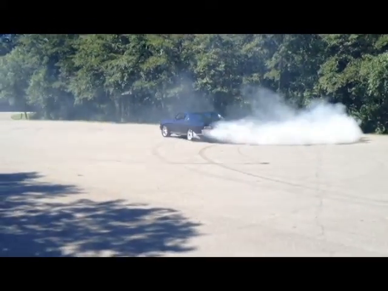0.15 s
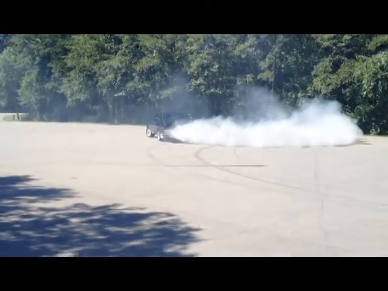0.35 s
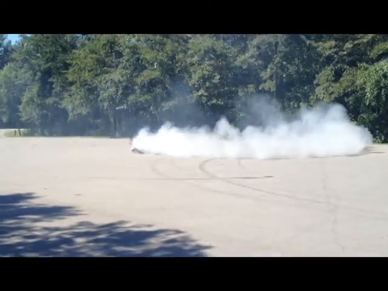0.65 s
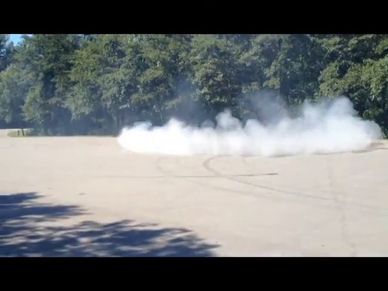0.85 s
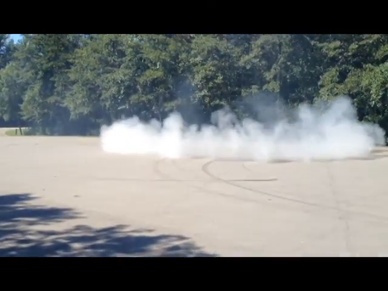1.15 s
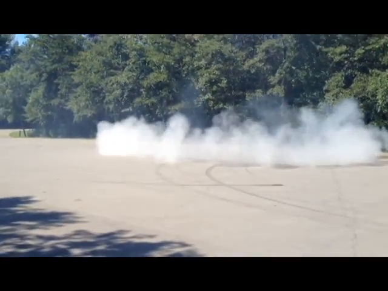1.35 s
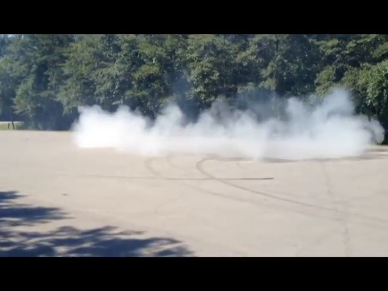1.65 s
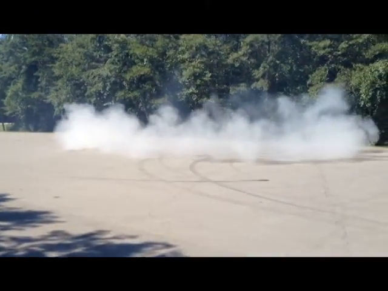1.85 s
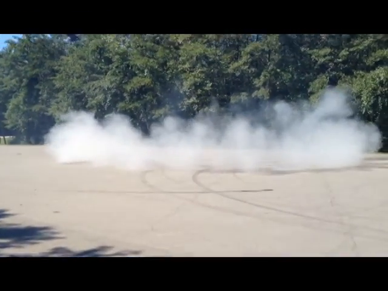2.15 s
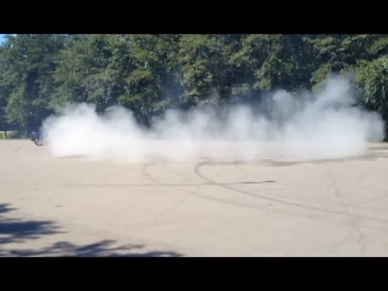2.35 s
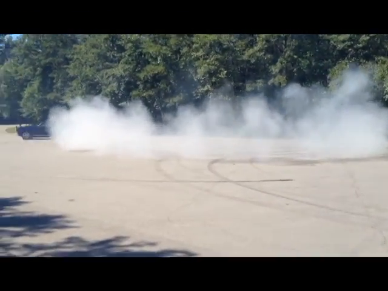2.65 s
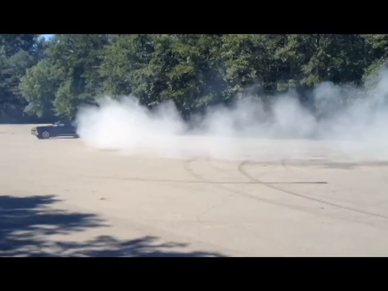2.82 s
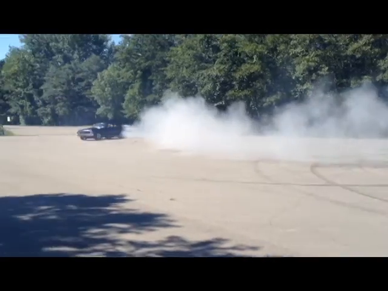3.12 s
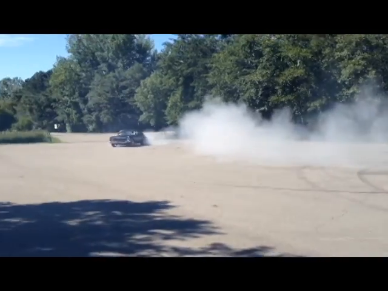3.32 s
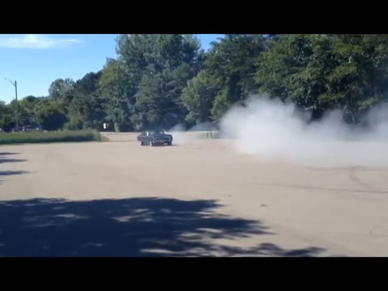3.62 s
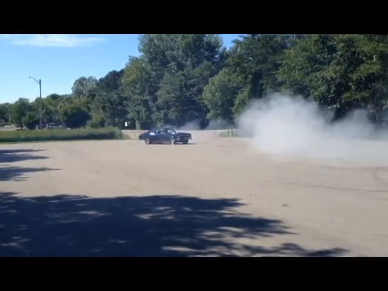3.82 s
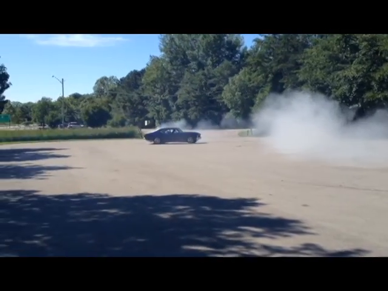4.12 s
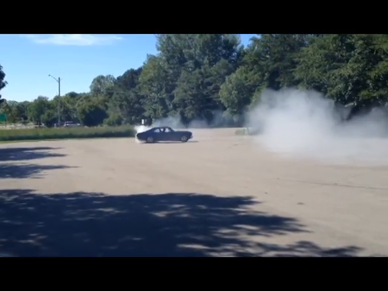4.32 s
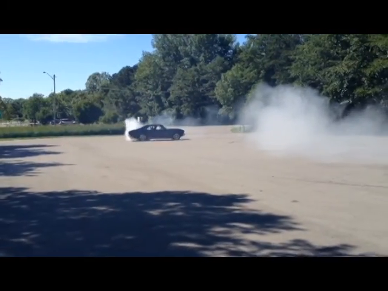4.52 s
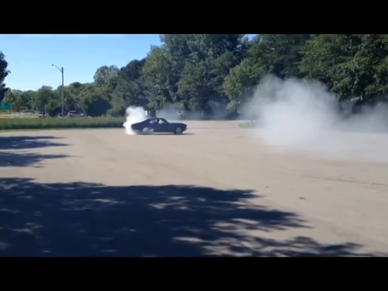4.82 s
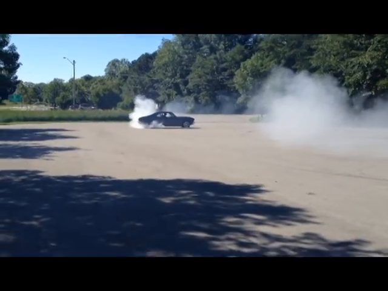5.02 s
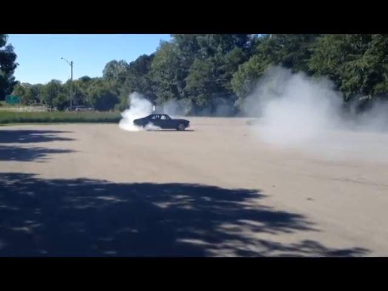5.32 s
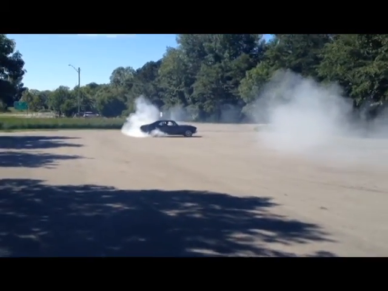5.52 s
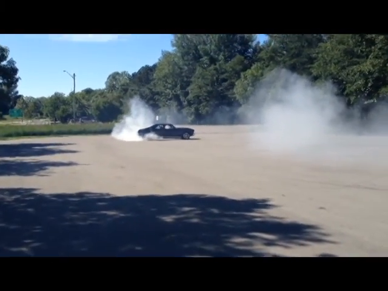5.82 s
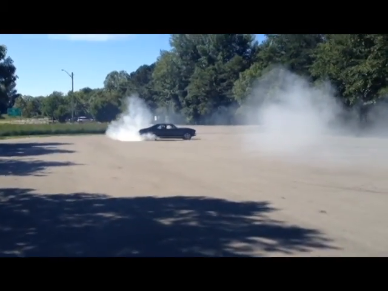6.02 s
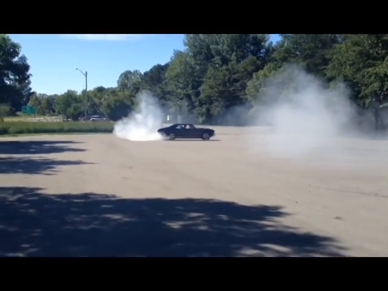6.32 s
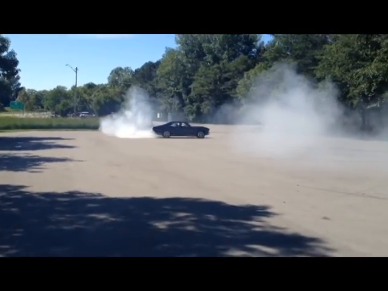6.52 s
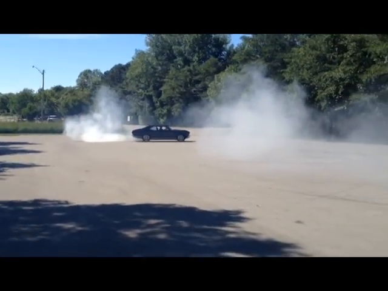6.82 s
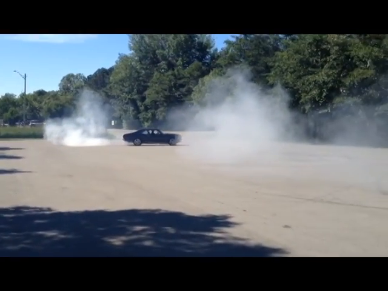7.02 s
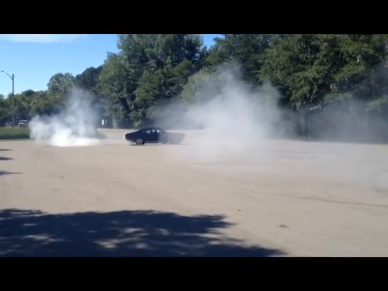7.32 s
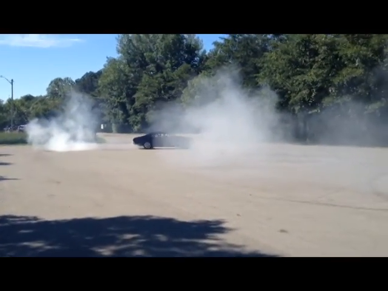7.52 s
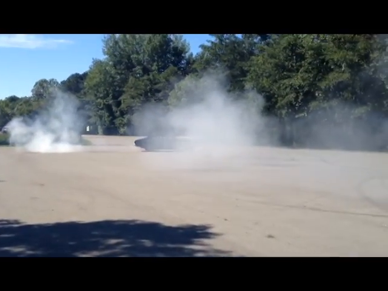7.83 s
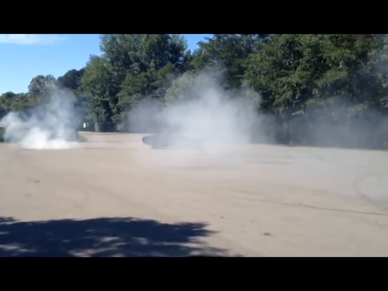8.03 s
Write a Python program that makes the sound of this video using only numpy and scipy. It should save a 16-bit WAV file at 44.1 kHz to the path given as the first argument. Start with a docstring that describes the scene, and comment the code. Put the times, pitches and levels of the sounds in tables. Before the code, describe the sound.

A distant car spins its tyres: dense, rough squealing around a high whistle pitch over a throaty V8 drone. Near two seconds everything drops briefly, the throttle crackles open and the squeal returns, fluttering into short yelps. After four and a half seconds it turns quiet, with soft engine blips, faint tyre hiss, leaves and far traffic, and a few dull ticks close to the microphone.

```python
"""A V8 car spins its rear tyres on an asphalt lot, lifts off, revs again, then rolls away far off at low revs.
The engine is a sum of orders of its two-turn cycle; the pipe crackles in noise puffs as the throttle opens.
The tyres squeal in stick-slip, as wavering tones with overtones, and scrub in two bands of noise.
A tree line answers with a scattered tail; far traffic, leaves, low bumps and short ticks lie around the car.
The pickup loses the lowest bass, holds peaks softly and ends at a band limit."""
import sys
import numpy as np
from scipy import signal
from scipy.fft import rfft, irfft, next_fast_len
from scipy.io import wavfile
from scipy.ndimage import uniform_filter1d, map_coordinates

SR = 44100
rng = np.random.default_rng(int(sys.argv[2]) if len(sys.argv) > 2 else 0)


def unload_audio(sound):
    """Save the sound as a 16-bit wav file, at the path given as the first command line argument."""
    columns = np.transpose(np.atleast_2d(sound))
    # keep every value between -1 and 1, then stretch to whole-number steps
    steps = np.round(np.clip(columns, -1, 1) * 32767)
    wavfile.write(sys.argv[1], SR, steps.astype(np.int16))


N = 359841
ENGINE_STEP, SQUEAL_STEP = 10, 5  # samples between points of the coarse clocks


def amp(db):
    """Gain of a level in dB, by the decibel law for amplitude."""
    return 10 ** (np.asarray(db) / 20)


def unit(x):
    """Scales x to unit mean power (rms 1)."""
    return x / np.sqrt(np.mean(x ** 2) + 1e-20)


def along(points, hz):
    """Interpolates (Hz, value) points on a logarithmic frequency axis."""
    f, v = np.transpose(points)
    return np.interp(np.log(hz + 1), np.log(f + 1), v)


def curves(rows, t):
    """Interpolates each column after the time linearly, at times t."""
    s, *columns = np.transpose(rows)
    return [np.interp(t, s, column) for column in columns]


def wobble(rate, t):
    """Band-limited randomness: a smooth curve through random knots, rate of them a second."""
    knots = rng.standard_normal(int(N * rate / SR) + 4)
    return map_coordinates(knots, [t * rate])


def filtered(x, response):
    """Linear filtering: the spectrum of x times a response of frequency."""
    m = next_fast_len(N + SR // 4)
    hz = np.fft.rfftfreq(m, 1 / SR)
    return irfft(rfft(x, m) * response(hz), m)[..., :N]


def rush(spectrum, patchy_db):
    """Turbulent noise of rms 1: white noise with random patches of gain in time and pitch, then coloured."""
    z = signal.stft(rng.standard_normal(N), nperseg=512)[2]
    field = uniform_filter1d(rng.standard_normal(z.shape), size=8, axis=0)
    field = uniform_filter1d(field, size=10, axis=1)
    patchy = signal.istft(z * amp(patchy_db * unit(field)), nperseg=512)[1][:N]
    return unit(filtered(patchy, lambda hz: amp(along(spectrum, hz))))


def engine(revs, rows, order, pipe, muffler_hz, width_hz, rumble_db, upper_db, pull_db):
    """Fourier orders of the two-turn cycle: eight firings give 8 and 16, uneven cylinders the others."""
    # Burble strength in dB by order within one firing interval, from order 0 to order 7.
    uneven_db = [-6, -7, -10, 0, -7, -5, -3, 0]
    clock = np.arange(0, N + ENGINE_STEP, ENGINE_STEP) / SR
    start, end = rows[0][0] - .1, rows[-1][0] + .1
    now = (clock >= start) & (clock <= end)
    t = clock[now]
    cycle_hz, = curves(revs, t)
    first_db, second_db, low_db, ring_db = curves(rows, t)

    # the upper burble follows the gain in speed (pull_db for each doubling a second) and wanders
    doublings_per_s = np.gradient(np.log2(cycle_hz), t)
    pull = pull_db * uniform_filter1d(doublings_per_s, size=400)
    upper = low_db + upper_db + pull + 3.0 * wobble(6, t)
    ring_db = ring_db + 1.04 * wobble(8, t)
    fade = np.clip(np.minimum(t - start, end - t) / .1, 0, 1)

    turn = 2 * np.pi * np.cumsum(cycle_hz) * ENGINE_STEP / SR
    first = amp(first_db + 1.2 * wobble(9, t)) * np.cos(8 * turn)
    second = amp(second_db + 1.2 * wobble(9, t)) * np.cos(16 * turn)
    sound = np.sqrt(2) * (first + second)
    for k in np.setdiff1d(np.arange(2, 56), [8, 16]):
        hz = k * cycle_hz
        burble_db = upper if k > order or k == 3 else low_db
        burble = amp(burble_db + uneven_db[k % 8] + along(pipe, hz))
        ring = amp(ring_db) / (1 + ((hz - muffler_hz) / width_hz) ** 2)  # muffler resonance
        # each order drifts in strength and phase as combustion varies
        strength = amp(2.5 * wobble(5, t))
        phase = k * turn + rng.normal(0, .006 * k * k) + .3 * wobble(4, t)
        # against the firing tone the orders cut a short gap once a cycle (one weak cylinder)
        sound -= np.hypot(burble, ring) * strength * np.cos(phase)

    heard = np.zeros(len(clock))
    heard[now] = fade * sound
    rumble_gain = np.interp(np.arange(N) / SR, t, fade * amp(low_db + rumble_db))
    rumble = rush(pipe, patchy_db=3) * rumble_gain
    return signal.resample_poly(heard, ENGINE_STEP, 1)[:N] + rumble


def spinning_engine():
    """Harmonic order synthesis under load: the engine while it spins the tyres."""
    # Cycle speed. Each row: time in seconds, two-turn cycles in Hz.
    spin_revs = [(0, 32.2), (1.03, 30.5), (1.16, 30), (1.55, 29.5), (1.64, 28.6), (1.68, 26.8), (1.8, 18.4),
                 (1.9, 17.8), (1.99, 21), (2.12, 25), (2.24, 28.2), (2.34, 29.8), (2.54, 31.6),
                 (2.84, 30.9), (3.01, 26), (3.15, 24.2), (3.3, 27.1), (3.37, 27.6), (3.58, 28.7),
                 (3.79, 30.6), (4.5, 30.5)]
    # Levels before random drift. Each row: time in seconds, firing tone, second firing tone,
    # burble (before pipe and order weights) and muffler ring, all in dB.
    spin_levels = [(0, -21, -52, -24.5, -19.5), (.2, -31.5, -40, -30, -24.5), (.36, -22, -42, -29.5, -31.5),
                   (.6, -16, -33, -37, -23.5), (.82, -15, -37, -29, -25), (1.24, -22, -40.5, -25.5, -34.5),
                   (1.58, -15.5, -38, -29, -35.5), (1.66, -24, -40, -23.5, -36),
                   (1.78, -28.5, -44, -35, -44), (1.9, -37.5, -57, -43, -53), (2, -16.5, -33, -28.5, -34),
                   (2.09, -21.5, -22, -29, -21.5), (2.23, -30, -30.5, -30, -31.5),
                   (2.39, -19.5, -56, -29, -38), (2.53, -16, -35, -31, -22), (2.7, -21, -59, -32, -43),
                   (2.82, -19.5, -49, -30, -21.5), (3, -26.5, -50, -34, -33),
                   (3.17, -23.5, -31, -32.5, -30), (3.31, -29.5, -32, -31.5, -23.5),
                   (3.7, -23, -39, -32.5, -34), (3.85, -31.5, -47, -28, -46), (4, -27.5, -44, -34.5, -46),
                   (4.22, -24.5, -46, -36.5, -34), (4.29, -53, -70, -42, -53), (4.5, -61, -70, -59, -44.5)]
    # Pipe response. Each row: frequency in Hz, gain in dB.
    spin_pipe = [(40, -63), (70, -26), (95, -23), (125, -28), (155, -4.5), (190, 0.5), (230, 5.5), (290, 3),
                 (400, -1.5), (520, -3.5), (900, -39)]
    return engine(spin_revs, spin_levels, order=9, pipe=spin_pipe, muffler_hz=615, width_hz=20.4,
                  rumble_db=-10, upper_db=-5.5, pull_db=3)


def stick_slip(t, hz, tone_db, over_db, spread, chirp_db):
    """Stick-slip friction: six patches of rubber, each with its own pitch, wavering and chirping."""
    sound = 0
    for place in np.linspace(-1, 1, 6):
        waver = place + .25 * wobble(5, t) + .75 * wobble(90, t)
        cycles = np.cumsum(hz * (1 + spread * waver)) * SQUEAL_STEP / SR
        turn = 2 * np.pi * (rng.uniform() + cycles)
        chirp = unit(amp(chirp_db * wobble(30, t)))
        # the third harmonic sounds only for pitches below 1300 Hz
        overtones = np.sin(2 * turn) + amp(-16.5) * np.sin(3 * turn) * (hz < 1300)
        patch = amp(tone_db) * np.sin(turn) + amp(over_db) * overtones
        sound = sound + 0.4 * chirp * patch
    return sound


def held_squeals():
    """Sustained stick-slip: squeals follow a pitch arch, slope in level and die away."""
    # Each row: start in seconds, length in seconds, pitch in Hz at start, middle and end,
    # tone level in dB at start and end, overtone level in dB at start and end (both before the
    # patch gain, chirp and swell), pitch spread of the rubber patches as a share.
    held_rows = [(0, .7, 953, 945, 930, -17.5, -21.5, -17.5, -19, .028),
                 (0.68, .9, 920, 920, 950, -22.5, -20, -24, -25, .028),
                 (0, 1.63, 1043, 1010, 1080, -24, -21.5, -29, -36, 0.026),
                 (1.68, .04, 974, 950, 930, -21, -28, -31, -36, 0.029),
                 (1.69, 0.067, 1040, 1040, 1080, -18, -23.5, -45, -50, 0.018),
                 (2, 1.67, 665.4, 830, 735, -25.5, -23, -43, -39, .1),
                 (2.03, 0.24, 1380, 1465, 1535, -25.5, -25.5, -42, -42, 0.01),
                 (2.299, .72, 1540, 1520, 1370, -24.5, -23.5, -64, -56, .011),
                 (2.2, 1.5, 937, 950, 990, -21.5, -27, -33, -35, .05),
                 (2.66, 0.46, 540, 523, 556, -28.5, -23.5, -21.5, -44, 0.0083),
                 (3.15, 0.186, 1145, 1150, 1220, -19, -17.5, -32, -28, 0.0149),
                 (2.95, 0.92, 1442, 1520, 1660, -19, -22.5, -49, -58, 0.093),
                 (3, .14, 1050, 1075, 1140, -23.5, -15, -37, -30, 0.01195),
                 (3.36, 0.29, 1125, 1090, 1110, -21, -23, -28, -46, 0.01545),
                 (3.699, 0.72, 960, 1000, 920, -17.5, -25.5, -31, -31.5, 0.055),
                 (4.411, .14, 780, 735, 736, -31, -30, -32, -32.5, .018),
                 (4.425, 1.36, 941, 1030, 990, -34.5, -42, -41, -52, .13)]
    attack_s, release_db_per_s, swell_db = .03, 200, 1.5
    clock = np.arange(0, N + ENGINE_STEP, SQUEAL_STEP) / SR
    sound = np.zeros(len(clock))
    for s, length, hz0, hz1, hz2, db0, db1, over0, over1, spread in held_rows:
        now = (clock >= s - attack_s) & (clock < s + length + .25)
        t = clock[now]
        u = np.clip((t - s) / length, 0, 1)
        arch = np.polyfit([0, .5, 1], [hz0, hz1, hz2], 2)
        release = release_db_per_s * np.maximum(t - s - length, 0)
        shape = swell_db * wobble(9, t) - release
        tone_db = db0 + (db1 - db0) * u + shape
        over_db = over0 + (over1 - over0) * u + shape
        voice = stick_slip(t, np.polyval(arch, u), tone_db, over_db, spread, chirp_db=4.0)
        sound[now] += voice * np.clip((t - s) / attack_s + 1, 0, 1)
    return signal.resample_poly(sound, SQUEAL_STEP, 1)[:N]


def scrub():
    """Abrasive friction: rubber tearing over grit gives a roar and a hiss that flutter together."""
    # Tyre and road noise. Each row: time in seconds, roar level in dB, hiss level in dB,
    # both before the trims and flutter below.
    scrub_levels = [(0, -26.5, -33), (.29, -27.5, -32.5), (.6, -29.5, -41.5), (.86, -27.5, -36.5),
                    (1.15, -31, -42), (1.35, -32.5, -39.5), (1.45, -33.5, -35), (1.58, -34, -36.5),
                    (1.82, -48, -59), (1.955, -39.5, -48), (1.985, -28, -42), (2.08, -31.5, -43),
                    (2.16, -31.5, -38), (2.3, -28, -39), (2.84, -25.5, -39.5), (2.9, -27.5, -44.5),
                    (3.45, -26, -42.5), (3.54, -30, -42.5), (4.23, -33.5, -43.5), (4.54, -55.5, -62.5),
                    (5.57, -49, -58), (5.95, -42, -49.5), (6.16, -46, -54.5), (7.23, -48.5, -53.5),
                    (7.82, -45.5, -51.5), (8.09, -56, -63), (8.16, -39, -49)]
    # Each row: frequency in Hz, relative density in dB per Hz; so too for the hiss.
    roar_spectrum = [(280, -35), (480, -13), (637, -5.5), (703, -5.5), (759, -8.5), (1050, -2.5),
                     (1270, -14), (1540, -5), (1740, -7), (2550, -10.5), (4540, -25.5), (5400, -34.5),
                     (6500, -38), (8450, -72), (14300, -120)]
    hiss_spectrum = [(2650, -12.5), (4500, 1), (5530, -3.5), (8140, 0.5), (9160, -2), (10600, -8),
                     (12800, -9), (14400, -17), (15400, -17)]
    t = np.arange(N) / SR
    roar_db, hiss_db = curves(scrub_levels, t)
    flutter = .8 * wobble(12, t) + 1.1 * wobble(90, t)
    roar = rush(roar_spectrum, patchy_db=1.5)
    # the roar is levelled by its 2300-5000 Hz part
    roar /= np.std(filtered(roar, lambda hz: (hz > 2300) & (hz < 5000)))
    hiss = rush(hiss_spectrum, patchy_db=1.2)
    return amp(roar_db - 3.0 + flutter) * roar + amp(hiss_db - 1.37 + flutter) * hiss


def air():
    """Many distant sources add up to steady coloured noise: far traffic and leaves."""
    # Each row: frequency in Hz, relative density in dB per Hz.
    air_spectrum = [(18, -58), (30, -30), (173, 19), (442, 2), (745, 7), (872, 6), (993, -3), (1220, 5.5),
                    (2230, -3), (2900, -9), (4760, -7.5), (5280, -17.5), (8240, -20), (14300, -30),
                    (15400, -44)]
    return amp(-40.5) * rush(air_spectrum, patchy_db=1.5)


def trees(x):
    """Diffuse scattering: the tree line sends the sound back, each frequency dying at its own speed."""
    # Each row: frequency in Hz, time in seconds to fall by 60 dB.
    tree_decay = [(150, 0.95), (1000, 0.96), (4000, 1), (12000, 0.16)]
    hz, t, z = signal.stft(rng.standard_normal(SR), SR, nperseg=256)
    decay = amp(-60 * t / along(tree_decay, hz)[:, None])
    tail = signal.istft(z * decay, SR, nperseg=256)[1]
    delayed = np.pad(x, (3000, 0))  # samples of travel to the trees and back
    return signal.fftconvolve(delayed, tail / np.linalg.norm(tail))[:N]


def yelps():
    """Brief stick-slip bursts: yelps swell and break off."""
    # Each row: start in seconds, length in seconds, pitch in Hz at start and end,
    # tone level in dB at the end of the swell, before the patch gain and chirp.
    yelp_rows = [(0.096, 0.059, 1035, 1060, -11.5), (.36, 0.095, 935, 960, -18),
                 (0.838, .04, 924, 1010, -11.5), (0.565, 0.059, 942, 1000, -17),
                 (1.177, 0.024, 1040, 900, -14), (1.25, 0.039, 1052, 1040, -11.5),
                 (1.428, 0.057, 1051, 1000, -17), (1.53, 0.074, 1046, 970, -15),
                 (2.109, 0.077, 1450, 1490, -19), (2.24, 0.036, 910, 1000, -22),
                 (2.296, 0.053, 976, 976, -16), (2.9, 0.042, 930, 770, -14),
                 (3.22, 0.1795, 1470, 1620, -16.5), (3.238, 0.091, 700, 690, -17.5),
                 (3.483, 0.054, 947, 959, -15.5), (3.605, 0.036, 1032, 1040, -15.5),
                 (3.732, 0.088, 947, 926, -8), (3.83, .045, 940, 945, -10), (3.971, .09, 952, 1020, -13.5),
                 (4.13, 0.053, 983, 1020, -11.5), (4.21, 0.044, 976, 1033, -8),
                 (4.306, 0.03, 1010, 970, -14.5), (4.348, 0.0595, 982, 900, -17.5)]
    rise_db, break_db_per_s, over_drop_db, spread = 7, 500, 16, .035  # spread: share of the pitch
    clock = np.arange(0, N + ENGINE_STEP, SQUEAL_STEP) / SR
    sound = np.zeros(len(clock))
    for s, length, hz0, hz1, db in yelp_rows:
        now = (clock >= s) & (clock < s + length + .08)
        t = clock[now]
        u = np.clip((t - s) / length, 0, 1)
        hz = hz0 + (hz1 - hz0) * u
        level = db - rise_db * (1 - u) - break_db_per_s * np.maximum(t - s - length, 0)
        voice = stick_slip(t, hz, level, level - over_drop_db, spread, chirp_db=1.0)
        sound[now] += voice * np.clip((t - s) / 0.0068, 0, 1)
    return signal.resample_poly(sound, SQUEAL_STEP, 1)[:N]


def knocks():
    """Damped impact modes: soft low bumps, and short dull ticks of a ring and a noise crack."""
    # Each row: start in seconds, level in dB (10 dB above the initial sine amplitude).
    bump_rows = [(0.129, -58), (0.377, -28), (0.929, -50), (1.289, -51), (1.62, -47), (3.359, -58),
                 (3.859, -59)]
    # Each row: start in seconds, level in dB before a 1.5 dB lift and the filter, ring in Hz,
    # crack level in dB against the ring.
    tick_rows = [(5.9575, -13, 1260, -14), (5.9726, -18.5, 1110, -20), (8.11, -26, 2120, -13),
                 (8.116, -27, 1940, -3), (8.1404, -25, 1980, -7)]
    bumps, ticks = np.zeros(N + SR), np.zeros(N + SR)
    t = np.arange(SR // 10) / SR
    for s, db in bump_rows:
        bump = np.sin(2 * np.pi * 70 * t) * amp(-60 * t / 0.023)
        bumps[round(s * SR):][:len(t)] += amp(db - 10) * bump
    for s, db, hz, crack_db in tick_rows:
        crack = amp(crack_db - 60 * t / 0.018) * rng.standard_normal(len(t))
        ring = np.sin(2 * np.pi * hz * t) * amp(-60 * t / .016) * (1 - np.exp(-t / .0005))
        ticks[round(s * SR):][:len(t)] += amp(db + 1.5) * (ring + crack)
    # thin below 500 Hz, dull above 5000 Hz
    dull = filtered(ticks[:N], lambda hz: 1j * hz / (500 + 1j * hz) / (1 + 1j * hz / 5000) ** 2)
    return bumps[:N] + dull


def crackle():
    """Impulsive jet noise: sharp tailpipe puffs as the throttle opens, each a rasp and a treble part."""
    # Each row: start in seconds, level in dB before filtering and trim, treble in dB against it.
    puff_rows = [(1.9717, -19, -24), (1.9894, -20, -26), (2.0074, -13, -29), (2.0194, -12.5, -24),
                 (2.0622, -16, -28), (2.0931, -21, -19), (2.1044, -18, -8), (2.119, -20, -20),
                 (2.133, -13.5, -20), (2.1444, -25, -10), (2.1575, -17, -19), (2.1714, -22, -8),
                 (2.2079, -38, -18), (2.2214, -15, -17)]
    # Rasp, then treble. Each row: low edge in Hz, high edge in Hz.
    puff_bands = [(2200, 5200), (7300, 11000)]
    puffs, t = np.zeros((2, N)), np.arange(SR // 25) / SR
    for s, db, treble_db in puff_rows:
        decay = amp([[db], [db + treble_db]] - 60 * t / .028)  # 60 dB down in .028 s
        puffs[:, round(s * SR):][:, :len(t)] += decay * rng.standard_normal((2, len(t)))
    sound = 0
    for band, part in zip(puff_bands, puffs):
        sos = signal.butter(5, band, "bandpass", fs=SR, output="sos")
        sound = sound + signal.sosfilt(sos, part)
    return amp(-1) * sound


def rolling_engine():
    """Harmonic order synthesis at low revs: the engine rolling far off."""
    # Cycle speed. Each row: time in seconds, two-turn cycles in Hz.
    roll_revs = [(4.5, 14), (5.5, 12), (5.7, 14), (5.9, 17), (5.97, 17.3), (6.2, 14.7), (6.4, 12.6),
                 (6.6, 12.5), (6.8, 13), (7.2, 13.4), (7.6, 16.2), (7.83, 17), (7.9, 16.8), (8, 15.8),
                 (8.16, 15)]
    # Levels before random drift. Each row: time in seconds, firing tone, second firing tone,
    # burble (before pipe and order weights) and muffler ring, all in dB.
    roll_levels = [(4.5, -57, -48, -61, -60), (4.97, -50.5, -58, -64, -73), (5.5, -69, -64, -54, -68),
                   (5.66, -61, -46, -40.5, -53), (5.86, -51, -33.5, -36.5, -41.5),
                   (6.09, -58, -33.5, -38.5, -45), (6.2, -68, -40, -40, -42), (6.54, -53, -47, -45.5, -54),
                   (6.75, -54, -44, -44, -43.5), (7.1, -54, -40, -38.5, -48.5), (7.4, -57, -39, -41, -38.5),
                   (7.61, -43, -30, -38, -39), (7.92, -62, -38, -37, -46), (8.05, -67, -64, -42.5, -62),
                   (8.16, -61, -66, -44, -75)]
    # Pipe response. Each row: frequency in Hz, gain in dB.
    roll_pipe = [(35, -48), (65, -16), (90, -29), (125, -31), (160, -1.5), (187, 7), (215, -15), (238, 0.5),
                 (290, -2.5), (400, -10), (450, -37), (900, -33.5)]
    return engine(roll_revs, roll_levels, order=18, pipe=roll_pipe, muffler_hz=587.0, width_hz=12.7,
                  rumble_db=-9.0, upper_db=-5, pull_db=0.5)


def scene():
    """Superposition: the car, its echo from the trees, the air and the knocks."""
    motor = spinning_engine() + rolling_engine()
    tyres = held_squeals() + yelps() + scrub()
    car = motor + crackle() + tyres
    echo = amp(-14) * trees(car)
    return (car + echo + air() + knocks())[None]


def record(dry):
    """Transducer limits: a first-order bass loss, soft saturation of peaks and a sharp band limit."""
    thin = filtered(dry, lambda hz: 1j * hz / (35 + 1j * hz))
    held = thin / (1 + np.abs(thin / .75) ** 8) ** (1 / 8)
    return filtered(held, lambda hz: hz < 15500)


dry = scene()
out = record(dry)
unload_audio(out)
```